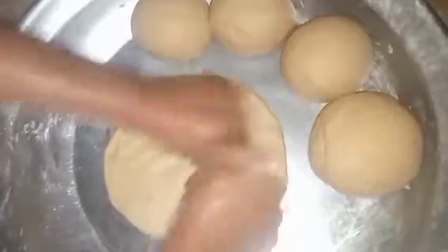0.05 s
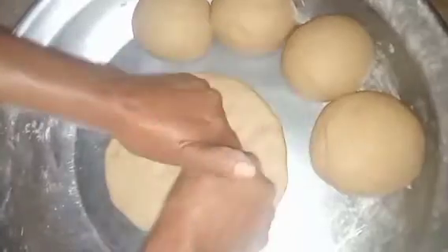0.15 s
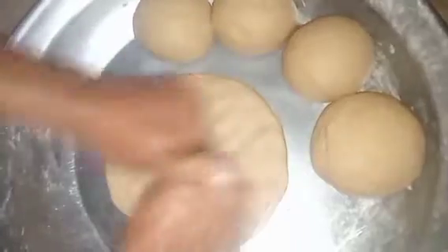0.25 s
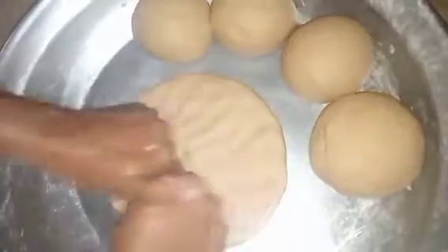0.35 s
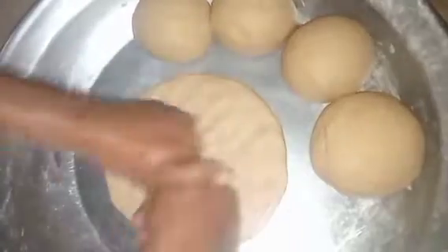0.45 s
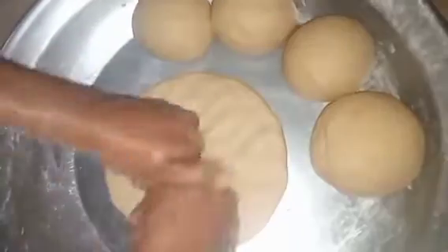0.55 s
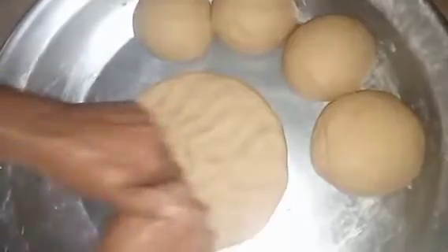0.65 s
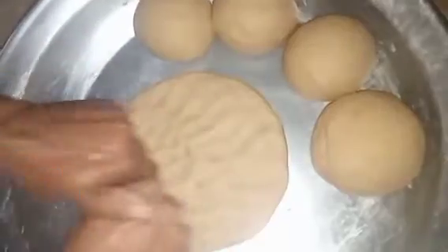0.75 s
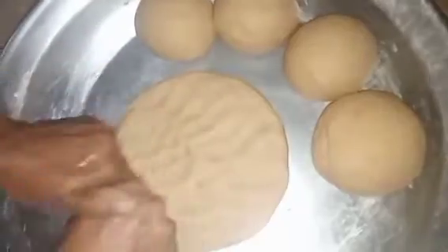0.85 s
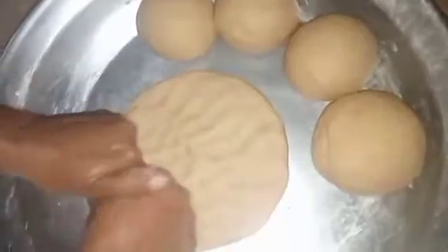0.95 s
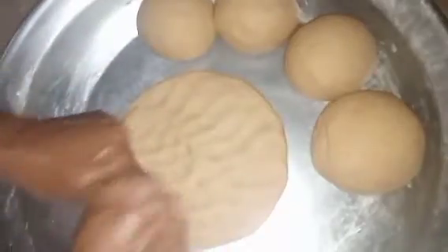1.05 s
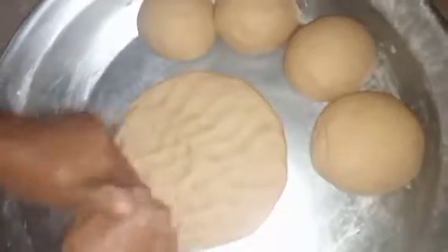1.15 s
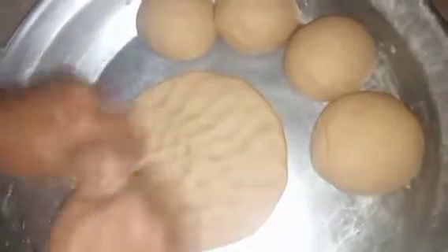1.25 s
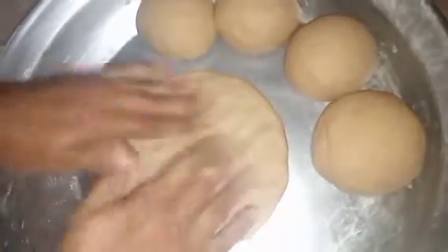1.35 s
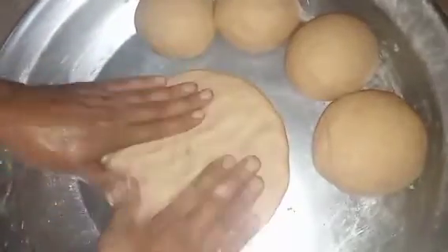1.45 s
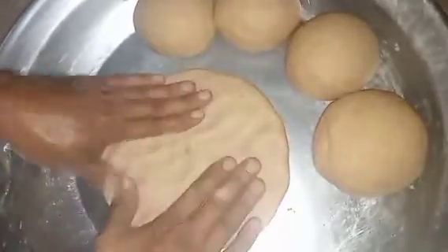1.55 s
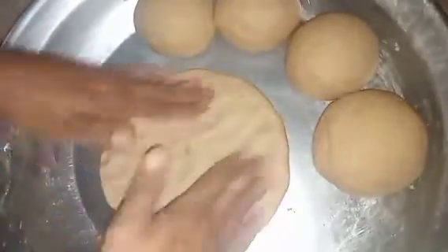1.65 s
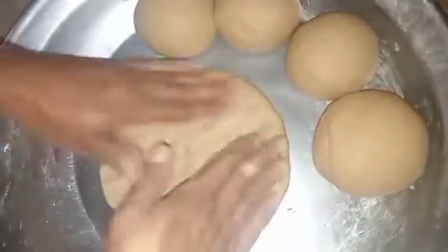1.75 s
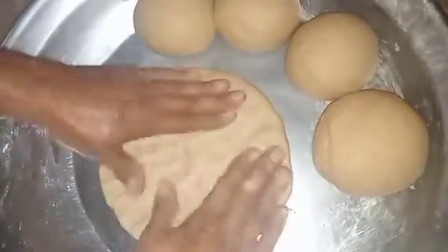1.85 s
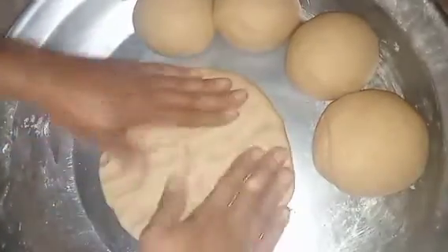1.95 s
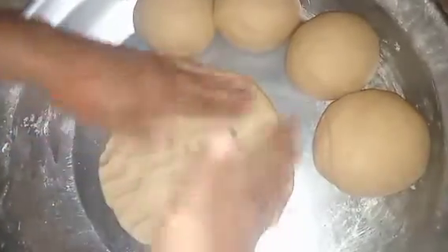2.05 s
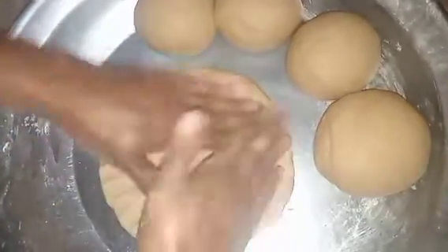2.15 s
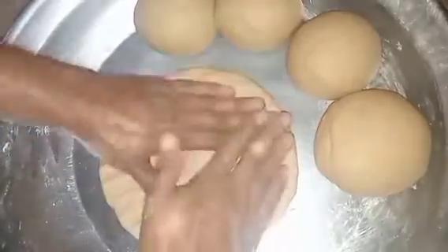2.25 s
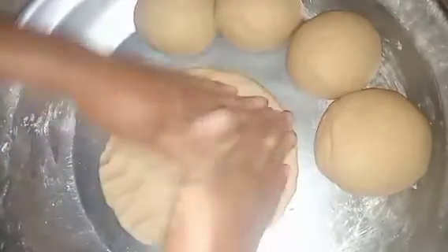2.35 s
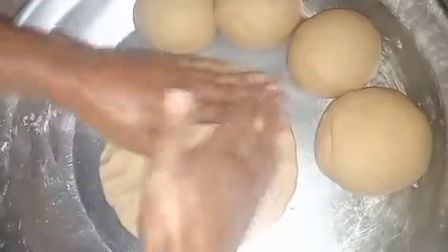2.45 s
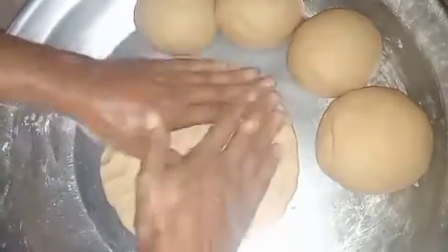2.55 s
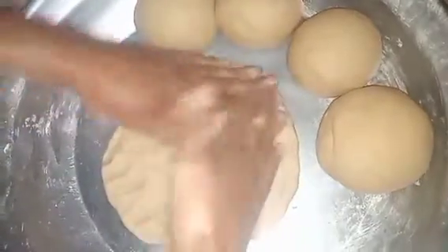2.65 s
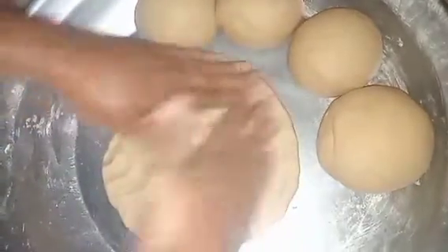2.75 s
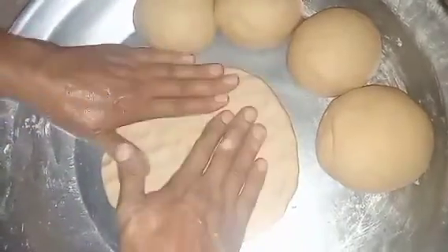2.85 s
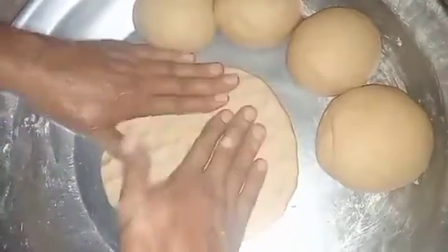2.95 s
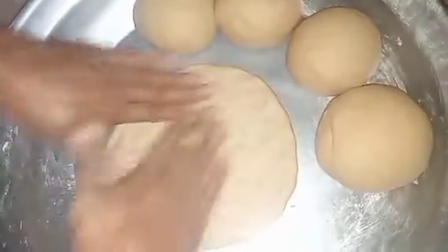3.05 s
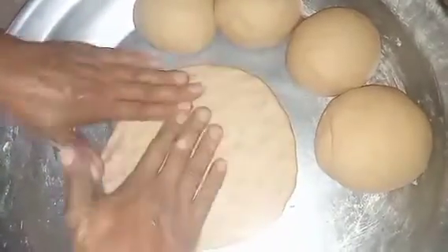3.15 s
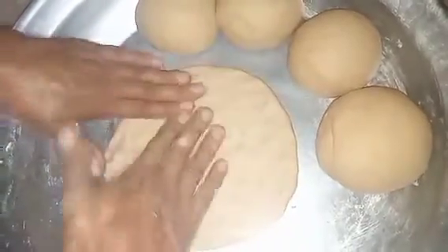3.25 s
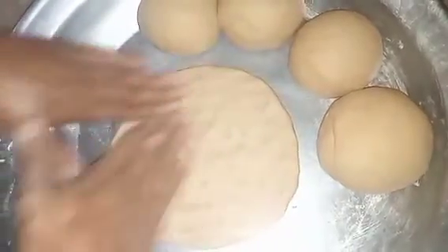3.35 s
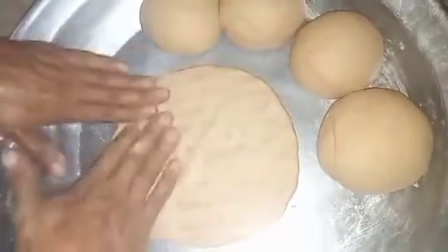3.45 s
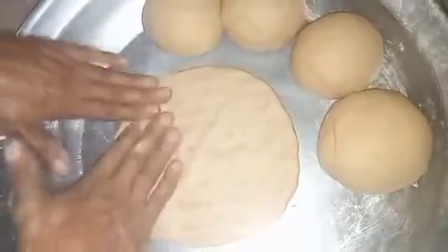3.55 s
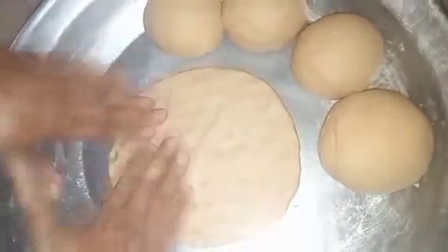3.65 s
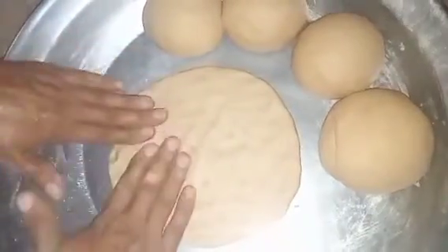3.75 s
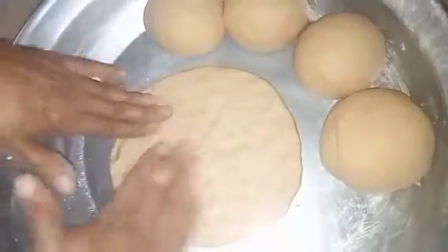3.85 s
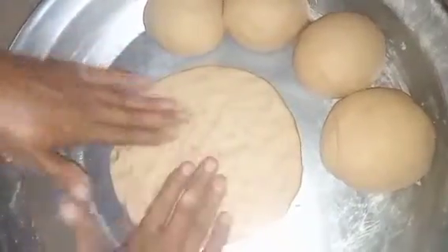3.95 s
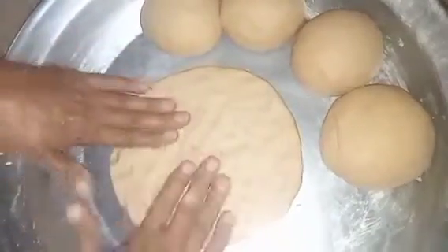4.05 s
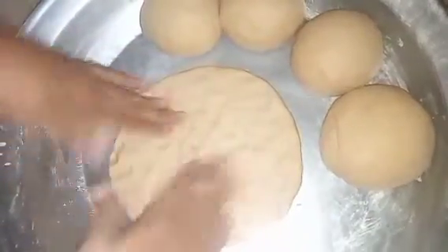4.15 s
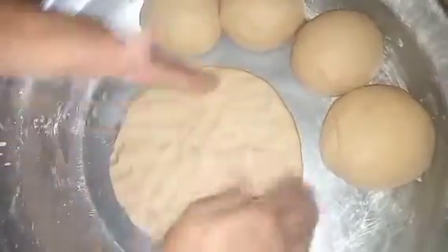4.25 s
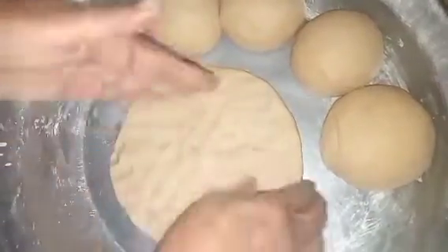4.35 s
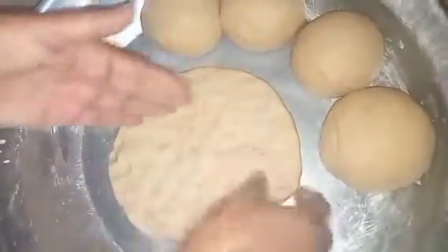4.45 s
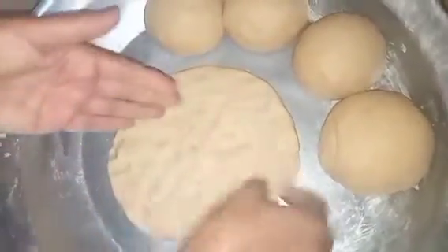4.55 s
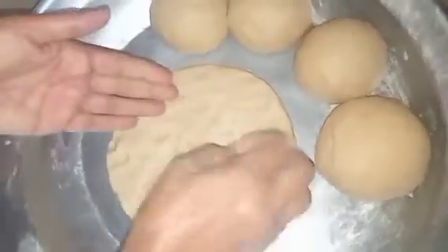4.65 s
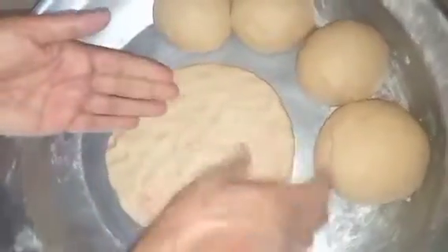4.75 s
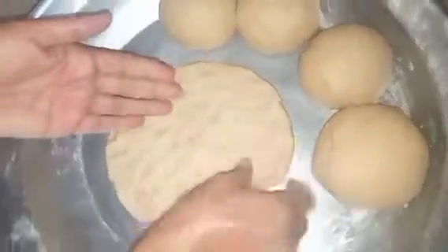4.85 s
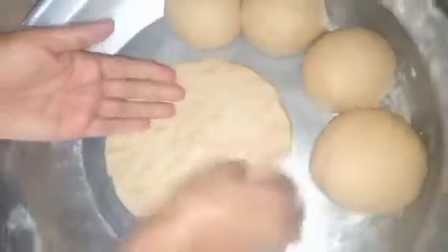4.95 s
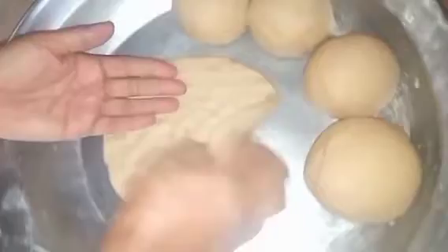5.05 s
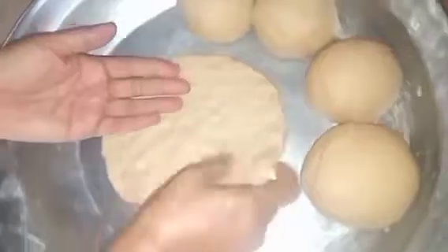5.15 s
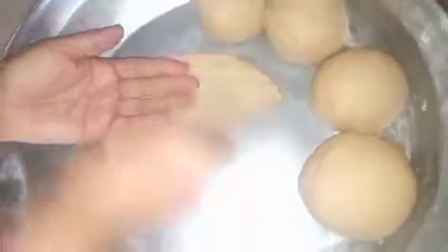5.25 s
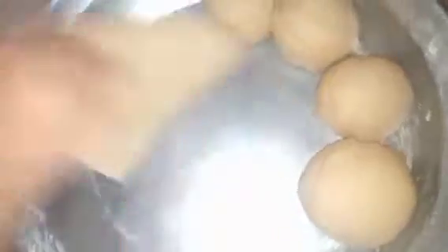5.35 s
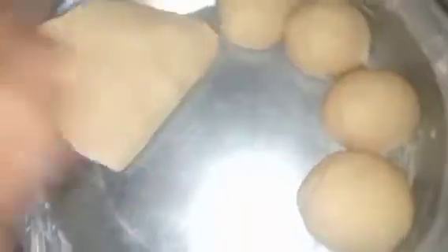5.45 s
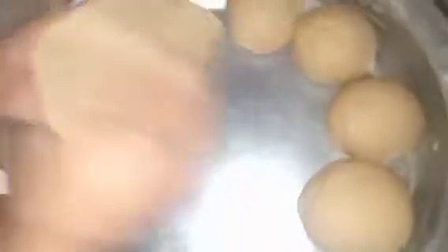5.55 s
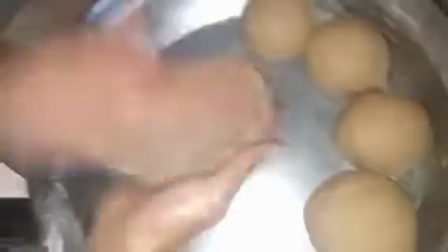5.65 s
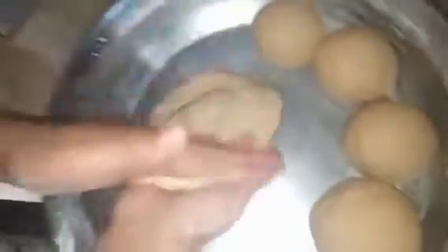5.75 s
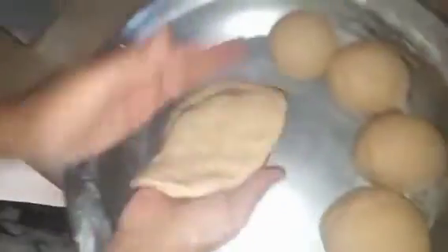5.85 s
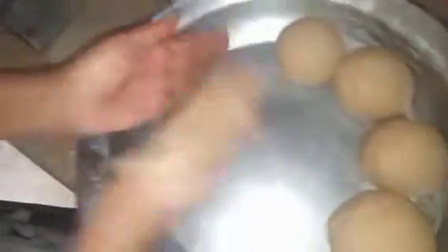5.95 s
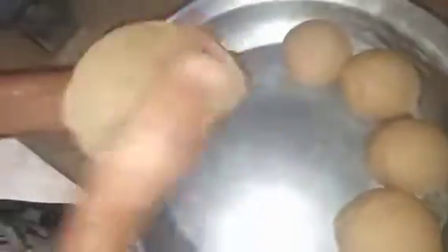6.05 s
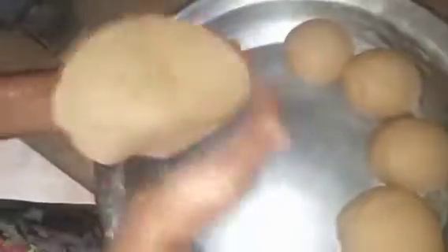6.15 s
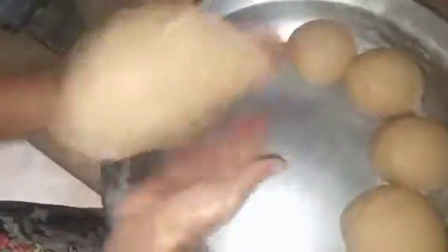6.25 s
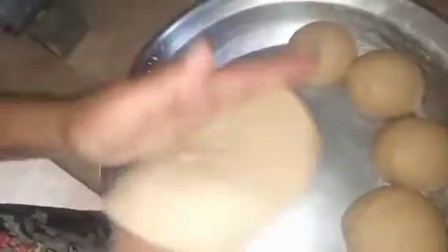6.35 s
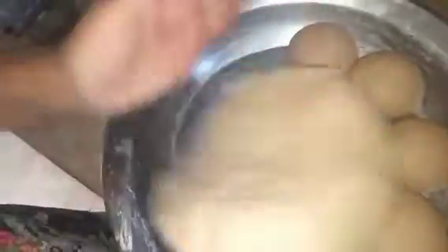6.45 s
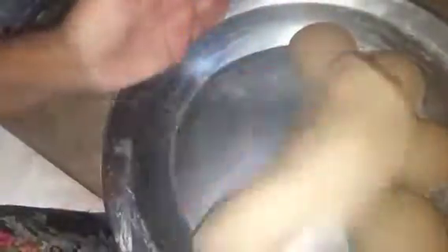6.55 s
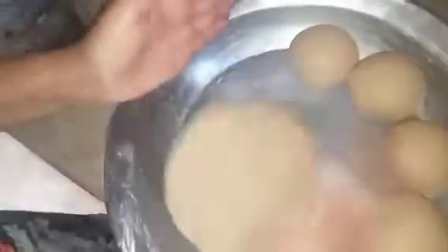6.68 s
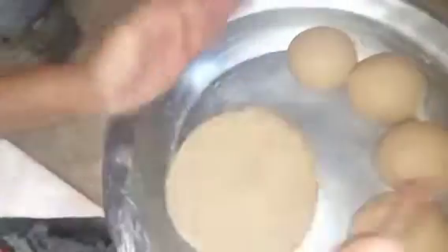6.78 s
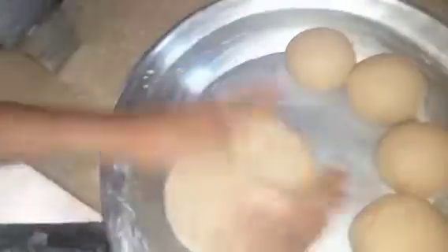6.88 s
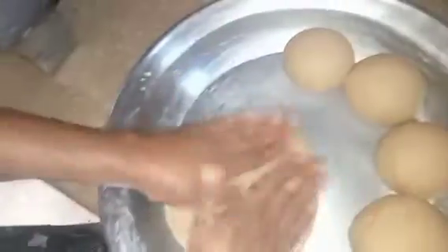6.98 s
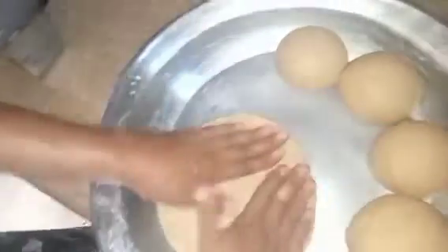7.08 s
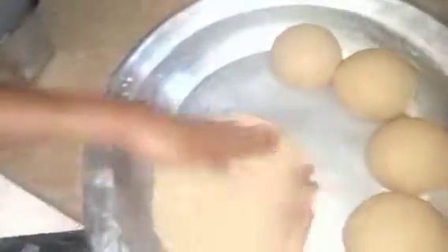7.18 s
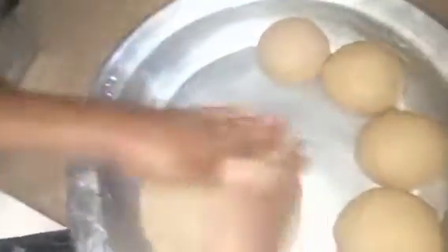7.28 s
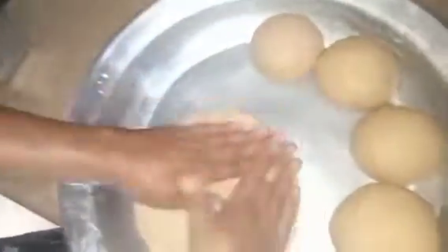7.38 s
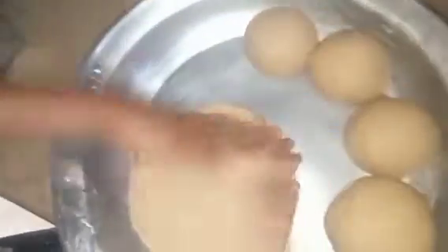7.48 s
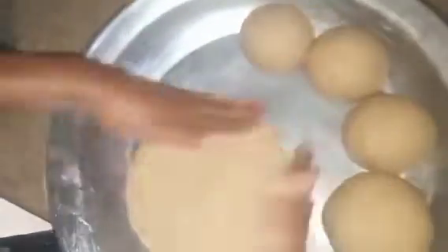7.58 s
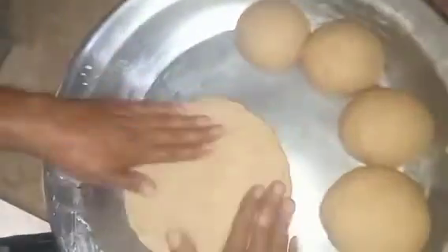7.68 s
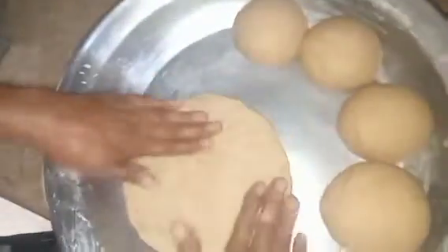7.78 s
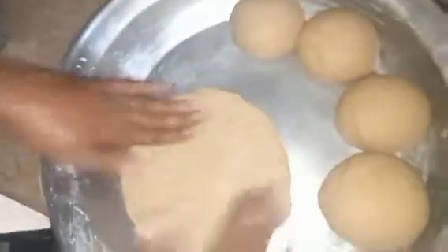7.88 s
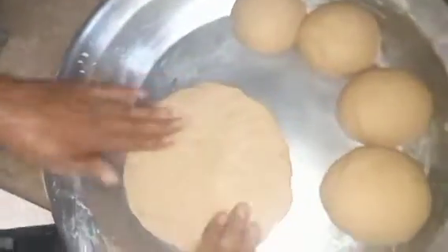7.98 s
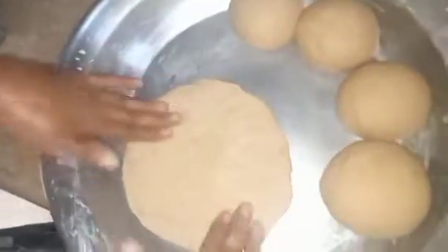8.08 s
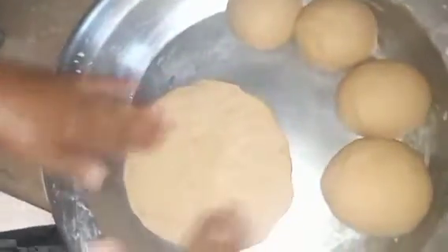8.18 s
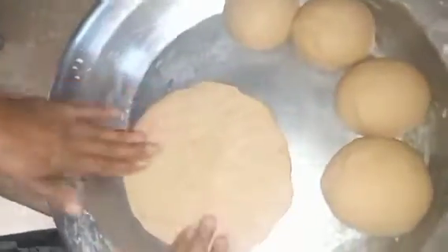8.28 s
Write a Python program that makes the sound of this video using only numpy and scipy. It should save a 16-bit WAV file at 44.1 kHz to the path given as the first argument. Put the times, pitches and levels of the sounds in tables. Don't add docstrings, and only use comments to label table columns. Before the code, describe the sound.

Close kitchen hiss with dull low palm thuds, quick dough slaps between hands, and a single loud slap onto steel at seven seconds.

```python
import sys
import numpy as np
from scipy import signal
from scipy.fft import rfft, irfft, next_fast_len
from scipy.io import wavfile
from scipy.ndimage import uniform_filter1d, minimum_filter1d

SR = 44100
rng = np.random.default_rng(int(sys.argv[2]) if len(sys.argv) > 2 else 0)


def ratio(d):
    e = np.asarray(d, float) / 20
    return 10 ** e


def unload_audio(sound):
    columns = np.transpose(np.atleast_2d(sound))
    steps = np.round(np.clip(columns, -1, 1) * 32767)
    wavfile.write(sys.argv[1], SR, steps.astype(np.int16))


N = 366912


def decay(t, t60):
    return np.exp(-np.log(1000) * t / t60)


def mode(x, hz, t60):
    radius = np.exp(-np.log(1000) / (t60 * SR))
    angle = 2 * np.pi * hz / SR
    return signal.lfilter([0, np.sin(angle)], [1, -2 * radius * np.cos(angle), radius ** 2], x)


def band(x, hz, width):
    return signal.lfilter(*signal.iirpeak(hz, hz / width, fs=SR), x)


def add(out, s, sound):
    i = int(s * SR)
    out[i:i + len(sound)] += sound[:N - i]


def walk(rate):
    hold = int(SR / rate)
    levels = np.repeat(rng.standard_normal(N // hold + 1), hold)
    return 1.4 * uniform_filter1d(uniform_filter1d(levels, hold), hold)[:N]


def burst(db, hz, width, t60, click=6.7):
    t = np.arange(8820) / SR
    push = rng.standard_normal(len(t)) * decay(t, t60) * (1 - np.exp(-t / 0.0027))
    push[44] = click
    puff = band(band(push, hz, 0.98 * width), hz, 0.98 * width)
    return puff * ratio(db) / np.abs(puff).max()


def swell(db, hz, length, place):
    u = np.arange(int(length * SR)) / (length * SR)
    bend = np.log(.5) / np.log(np.clip(place, .1, .9))
    shape = np.sin(np.pi * u ** bend) ** 1.54
    return ratio(db) * shape * np.sin(2 * np.pi * hz * length * (u + 0.041 * (u * u - u)))


def soften(x):
    return signal.sosfilt(signal.butter(6, 4400, fs=SR, output="sos"), x)


# pitch in Hz, level in dB per Hz.
JET_COLOUR = [(25, -37), (60, -13), (160, -16), (260, -10), (420, -14.5), (700, -23), (1150, -16.5),
              (1900, -11), (2900, -6.5), (4200, -8.5), (4700, -18), (5200, -24.5)]
# pitch in Hz, level in dB per Hz.
AIRY_TOP = [(5200, -24), (5600, -29), (6200, -27.5), (7500, -34), (8800, -37), (9700, -45), (11300, -47.5),
            (12200, -49.5), (13500, -51.5), (15600, -52), (17000, -76)]
# pitch in Hz, width in Hz, lift in dB.
POT_RESONANCES = [(110, 48, 11.5), (236.5, 7.2, 4), (313.5, 16, 8.5), (348.6, 29.6, 12), (492, 21, 3.5),
                  (951, 78, 14), (1220, 50, -1.5), (1513, 80, 10.5), (2050, 44, 4.5), (2332, 17, 8),
                  (2560, 83, 4), (2880, 34, 4), (2950, 55, 4.5), (3122, 52, 8.5), (3390, 90, 5),
                  (3560, 66, 5), (3780, 150, 3.5), (4300, 50, 3.5)]
# time in seconds, effort in dB.
HAND_EFFORT = [(0.0, 8), (0.5, -3.5), (0.8, -1.5), (1.25, 5), (1.7, -2), (2.08, 0), (2.46, -6), (2.94, 0),
               (3.25, 3), (3.75, -0.5), (4.15, 2), (4.73, -0.5), (6.0, -2), (6.25, -6), (6.8, -5),
               (7.15, 0.5), (7.7, -4), (8.32, -3)]
RUMBLE_FADES_HZ = 650
SWELL_DB = 0.29
HOLLOW_HZ, HOLLOW_FLUTTER_DB = 660, 1.3


def burner():
    size = next_fast_len(N)
    f = np.maximum(np.arange(size // 2 + 1) * SR / size, 1)
    hz, db = np.transpose(JET_COLOUR + AIRY_TOP[1:])
    gain = ratio(np.interp(np.log(f), np.log(hz), db))
    lift = 1
    for centre, width, lift_db in POT_RESONANCES:
        lift = lift + (ratio(2 * lift_db) - 1) / (1 + (2 * (f - centre) / width) ** 2) ** 2
    gain = gain * np.sqrt(lift)
    ripple = np.interp(f, np.arange(400) * 60, rng.standard_normal(400))
    gain = gain * ratio(2.6 * ripple * np.clip(f / 1500 - 2, 0, 1))
    jet = rfft(rng.standard_normal(size)) * gain

    effort_db = np.interp(np.arange(N) / SR, *np.transpose(HAND_EFFORT))
    breathing_db = SWELL_DB * walk(2.924)
    fade = np.exp(-1 / (0.027 * SR))
    out = 0
    for octave in np.arange(4, 14.6, .5):
        share = np.cos(np.pi * np.clip(np.log2(f) - octave, -.5, .5)) ** 2
        rumble = np.clip((np.log2(RUMBLE_FADES_HZ) - octave) / 3.6, 0, 1)
        hollow_db = HOLLOW_FLUTTER_DB * np.exp(-(octave - np.log2(HOLLOW_HZ)) ** 2 / .25)
        puffs = (rng.random(N) < 14 / SR) * rng.random(N)
        sputter = signal.lfilter([1], [1, -fade], puffs)
        flutter_db = (0.74 + hollow_db) * walk(12)
        flutter_db = flutter_db + 5.4 * sputter * np.clip((octave - 11.5) / 1.6, 0, 1)
        level = ratio(rumble * effort_db + breathing_db + flutter_db)
        out = out + irfft(jet * share, size)[:N] * level
    return out / out.std() * ratio(-35.5)


# start in seconds, peak in dB.
FLOUR_TICKS = [(0.159, -57), (0.2584, -65), (0.4594, -65), (1.4187, -58), (1.6636, -64), (2.1695, -63),
               (2.6464, -64.5), (2.9587, -73), (3.1654, -59), (4.2294, -62), (4.3046, -57), (5.2634, -62),
               (5.4171, -59.5), (6.1534, -59), (6.5066, -58), (6.5415, -58), (7.1741, -68), (7.5582, -57),
               (7.7324, -63), (7.8885, -56), (8.0054, -75), (8.2122, -56)]
TICK_HZ, TICK_SPREAD = 11900, .04


def ticks():
    out = np.zeros(N)
    for s, db in FLOUR_TICKS:
        hz = TICK_HZ * (1 + TICK_SPREAD * rng.standard_normal())
        add(out, s - .001, burst(db + .5, hz, 4500, .06, click=1))
    return out


# start in seconds, peak in dB, pitch in Hz, length in seconds.
PLATE_SWELLS = [(.16, -38.5, 112.2, .12), (.46, -41.5, 113, .12), (.7, -45, 115, 0.12),
                (1.001, -40, 100, .043), (1.248, -45, 115, 0.13), (1.92, -46, 104, 0.091),
                (2.64, -40.5, 108, 0.066), (2.85, -47, 110, 0.25), (3.18, -44, 109, 0.077),
                (3.77, -42, 120, .08), (3.876, -40, 116, .04), (4.084, -36, 115, .045),
                (4.34, -37, 116, .06), (4.68, -45.5, 119, .066), (5.6, -45, 110, 0.57),
                (6.985, -17, 109.5, .125), (7.092, -32.5, 112, .055), (7.15, -40, 113, 0.091),
                (7.304, -27.5, 103, .036), (7.331, -32, 118, 0.081), (7.638, -30, 110, .07),
                (7.703, -42, 114, 0.094)]


def presses():
    out = np.zeros(N)
    for s, db, hz, length in PLATE_SWELLS:
        add(out, s, swell(db, hz, length, 0.39))
    return out


# start in seconds, thud peak in dB, thud pitch in Hz, contact in seconds, # low room note
# in dB.
PALM_PATS = [(0.05, -37.5, 84, .09, -41), (0.568, -27.5, 93, .05, -37.5), (1.07, -31, 91.5, 0.043, -51),
             (1.424, -38, 101, .033, -46), (1.532, -29.5, 111, .1, -50), (1.715, -34.5, 90, .055, -52),
             (2.06, -35, 104, 0.089, -46), (3.025, -39, 92.4, .06, -52), (3.3, -40, 85, 0.061, -47),
             (3.642, -31, 82, 0.033, -33.5), (3.943, -22.5, 96, 0.058, -30),
             (4.203, -27.5, 110, 0.017, -31.5), (6.984, -26, 99, .026, -45), (7.28, -27.5, 118, 0.027, -52),
             (7.613, -29.5, 119, 0.029, -48), (7.95, -44, 80, 0.082, -43.5), (8.21, -43, 75, 0.12, -57)]
THUD_PLACE = 0.26
BUMP_HZ, BUMP_DB, BUMP_S = 60.4, -14, 0.053
RING_HZ, RING_S, RING_PLACE, RING_LATE_S = 114, .11, 0.31, 0.0298


def pats():
    out = np.zeros(N)
    for s, db, hz, contact, ring_db in PALM_PATS:
        add(out, s, swell(db, hz, contact, THUD_PLACE))
        add(out, s, swell(db + BUMP_DB, BUMP_HZ, BUMP_S, THUD_PLACE))
        ring_starts = s + RING_LATE_S + 0.397 * contact
        add(out, ring_starts, swell(ring_db, RING_HZ, RING_S, RING_PLACE))
    return out


# start in seconds, peak in dB, air pocket pitch in Hz,
# time to die by 60 dB in seconds.
SKIN_SLAPS = [(.578, -40, 403, 0.074), (1.069, -39, 1100, 0.037), (3.655, -34, 900, .05),
              (3.93, -28, 950, 0.04), (3.93, -25, 1700, .03), (3.946, -37, 320, .033),
              (4.21, -32, 270, 0.065), (4.25, -34, 230, .055), (4.63, -31, 2000, .06),
              (4.643, -23, 2310, .065), (5.07, -27, 2130, 0.028), (5.663, -20.5, 1250, .012),
              (5.6644, -22.5, 900, 0.016), (5.948, -28, 990, 0.043), (5.9538, -20, 1200, .018),
              (5.955, -16, 900, 0.031), (5.954, -31, 300, 0.049), (5.956, -34, 2200, .02),
              (5.954, -22, 590, .022), (6.569, -25, 1800, 0.044), (6.968, -27, 900, .03),
              (7.218, -25, 2050, 0.047), (7.285, -27.5, 900, .057), (7.287, -25, 1900, .04),
              (7.291, -31.5, 247, 0.09), (7.62, -39, 200, 0.09)]
POCKET_WIDTH = 0.65


def slaps():
    out = np.zeros(N)
    for s, db, hz, t60 in SKIN_SLAPS:
        add(out, s - .001, burst(db, hz, POCKET_WIDTH * hz, t60))
    return soften(out)


# start in seconds, peak in dB, air pocket pitch in Hz.
FINGERTIPS = [(6.9747, -25, 2000), (6.978, -14, 1000), (6.980, -3, 980), (6.9812, 1, 2970),
              (6.984, -5.5, 805), (6.9859, -10, 2330), (6.988, -4.5, 1020), (6.9907, -16, 2600),
              (6.997, -19, 1390), (7.003, -13, 2220), (7.009, -16, 1800), (7.014, -15, 1290),
              (7.021, -12, 2400), (7.03, -15, 1800)]
# pitch in Hz, level in dB,
# time to die by 60 dB in seconds.
PLATE_MODES = [(230, -10, 0.074), (316, -10.5, 0.12), (471, -3, 0.066), (623, -15, 0.028), (720, -4, 0.052),
               (806, -2, 0.038), (970, -8.5, 0.043), (1102, -4, 0.058), (1350, -17, 0.022),
               (1588, -1, 0.054), (1800, -14, 0.036), (2100, -3.5, 0.017), (2310, 1, .03),
               (2690, -4, 0.016), (3160, 5, 0.034), (3410, 2.5, 0.03), (3880, 2, 0.015), (4150, -3, 0.02)]
SPOT_DETUNE = 0.043


def plate_ring():
    click = np.eye(1, 8820)[0]
    signs = np.sign(rng.standard_normal(len(PLATE_MODES)))
    ring = 0
    for sign, (hz, db, t60) in zip(signs, PLATE_MODES):
        detuned_hz = hz * (1 + SPOT_DETUNE * rng.standard_normal())
        ring = ring + sign * ratio(db) * mode(click, detuned_hz, t60)
    return ring / np.abs(ring).max()


def smack():
    body, crack = np.zeros(N), np.zeros(N)
    for s, db, pocket_hz in FINGERTIPS:
        add(body, s, ratio(db - 3.5) * plate_ring())
        add(body, s - .001, burst(db - 2.5, pocket_hz, 1000, 0.041))
        add(crack, s, burst(db - 30.5, 6600, 2600, 0.027, click=1))
        add(crack, s, burst(db - 45, 10500, 5000, 0.052, click=1))
    return soften(body) + crack


ROOM_T60_S, ROOM_DB = 0.29, -14.5


def room(x):
    t = np.arange(SR // 2) / SR
    echoes = band(rng.standard_normal(len(t)), 1350, 2700)
    tail = echoes * decay(t, ROOM_T60_S) * (1 - np.exp(-t / 0.0043))
    tail = tail / np.sqrt(np.sum(tail ** 2))
    return x + ratio(ROOM_DB) * signal.fftconvolve(x, tail)[:N]


def scene():
    struck = ticks() + slaps() + smack()
    return (burner() + presses() + pats() + room(struck))[None]


def band_limit(x):
    return signal.sosfilt(signal.butter(12, 15504, fs=SR, output="sos"), x)


DUCK_KNEE_DB, DUCK_SLOPE, DUCK_S = -23.5, 0.19, 0.077


def record(dry):
    dry = signal.sosfilt(signal.butter(3, 48, "high", fs=SR, output="sos"), dry)
    keep = np.exp(-1 / (DUCK_S * SR))
    loudness = signal.lfilter([1 - keep], [1, -keep], dry ** 2)
    dry = dry * (1 + loudness / ratio(2 * DUCK_KNEE_DB)) ** -DUCK_SLOPE
    headroom = minimum_filter1d(np.minimum(1, .93 / np.abs(dry + 1e-9)), size=177)
    mix = dry * uniform_filter1d(headroom, size=89)
    return band_limit(mix)


dry = scene()
out = record(dry)
unload_audio(out)
```